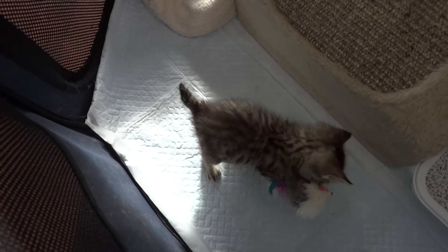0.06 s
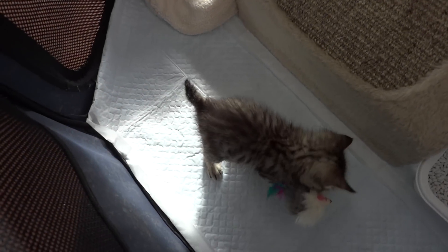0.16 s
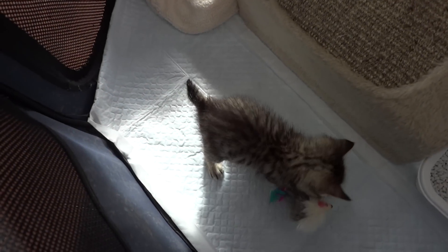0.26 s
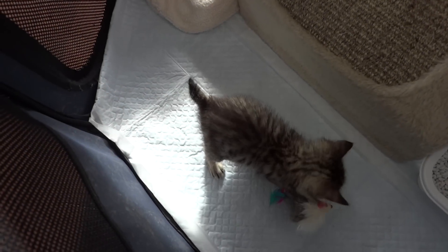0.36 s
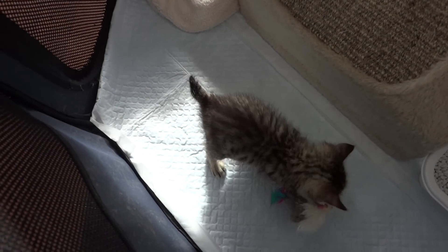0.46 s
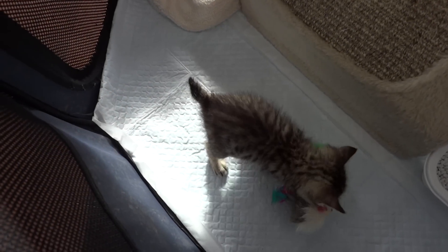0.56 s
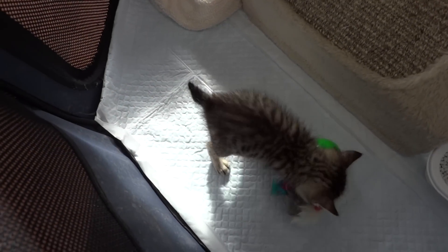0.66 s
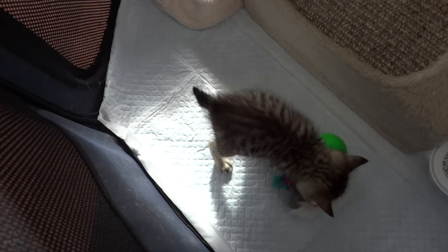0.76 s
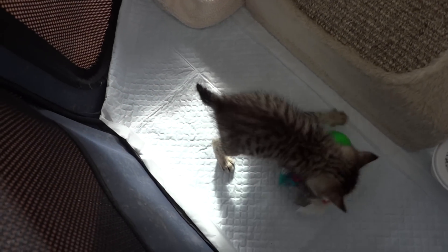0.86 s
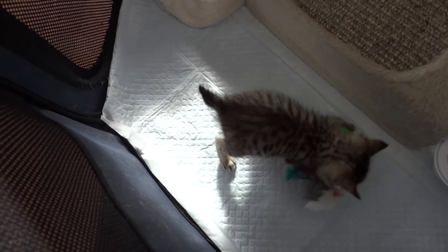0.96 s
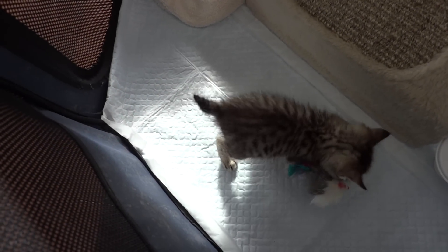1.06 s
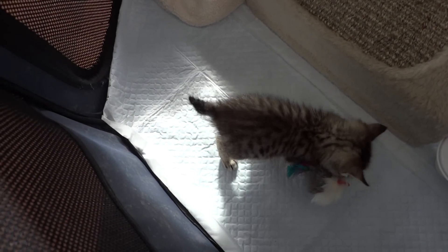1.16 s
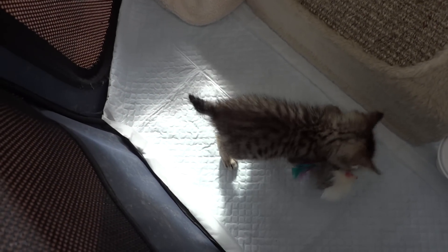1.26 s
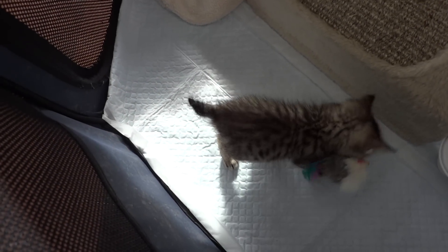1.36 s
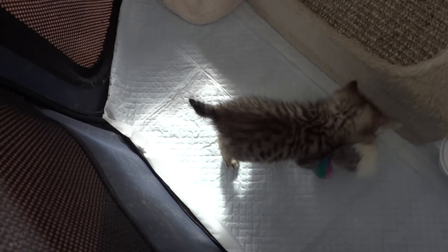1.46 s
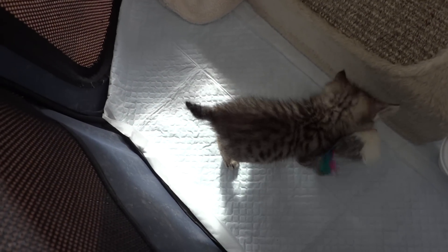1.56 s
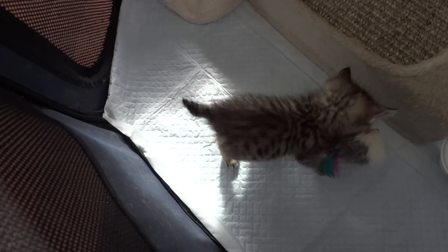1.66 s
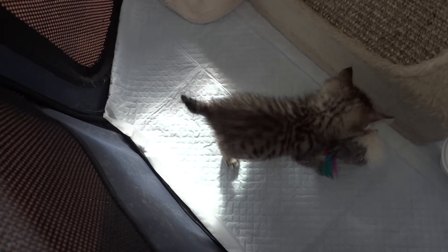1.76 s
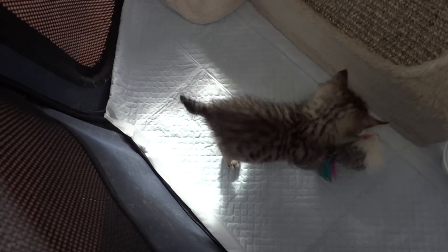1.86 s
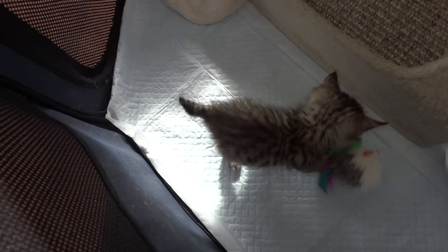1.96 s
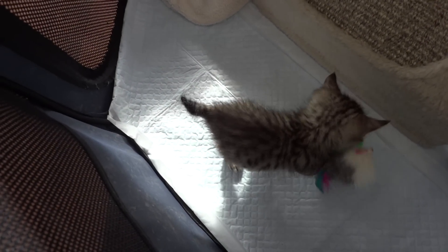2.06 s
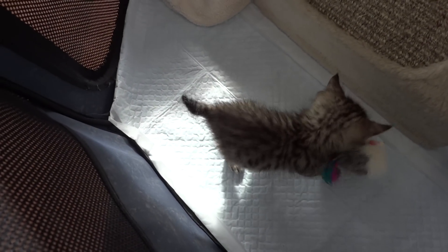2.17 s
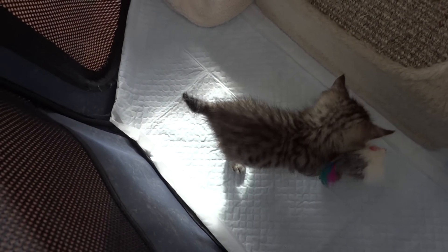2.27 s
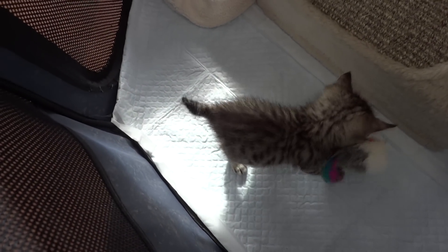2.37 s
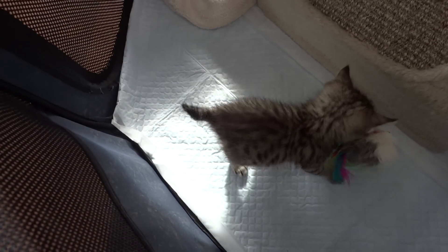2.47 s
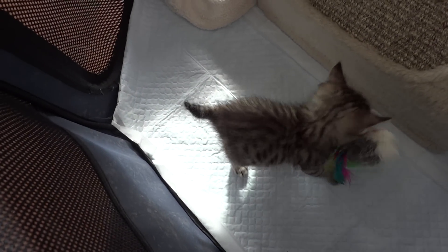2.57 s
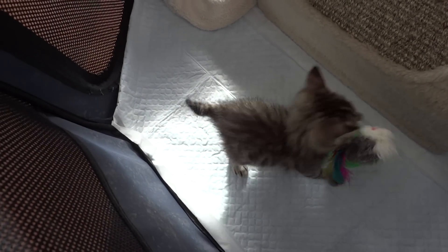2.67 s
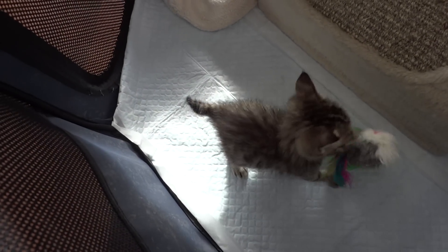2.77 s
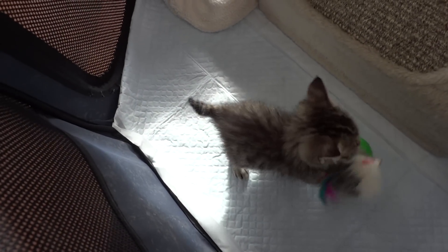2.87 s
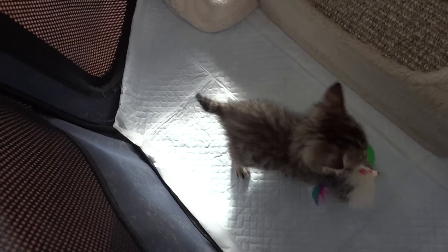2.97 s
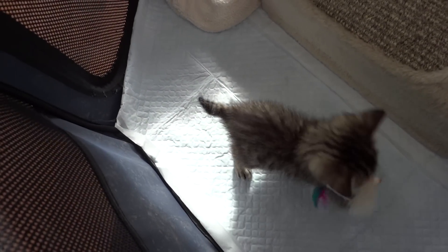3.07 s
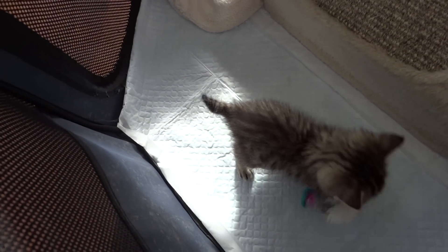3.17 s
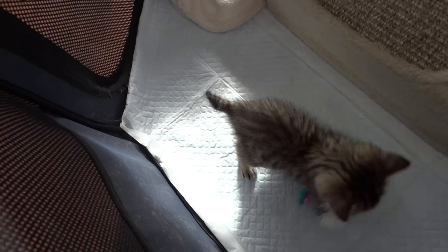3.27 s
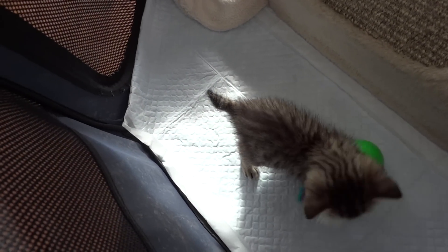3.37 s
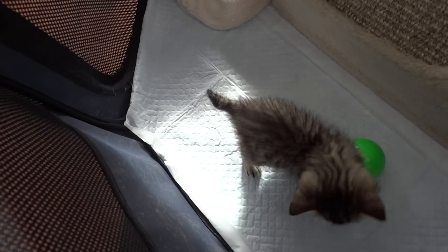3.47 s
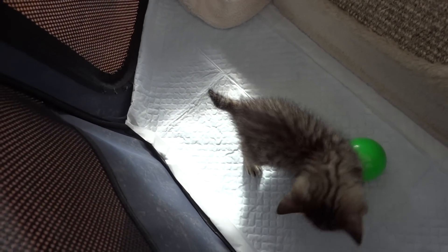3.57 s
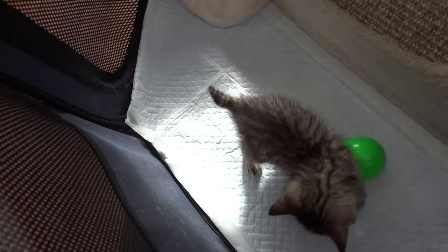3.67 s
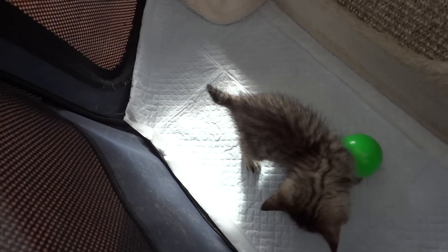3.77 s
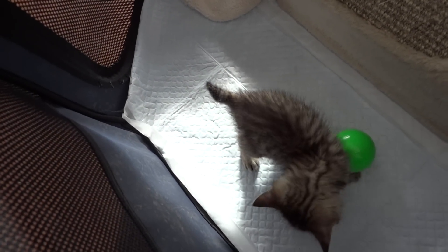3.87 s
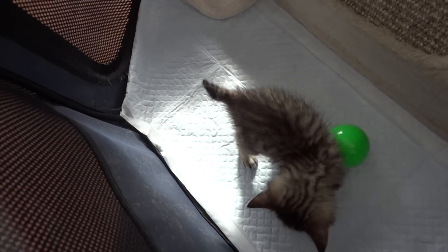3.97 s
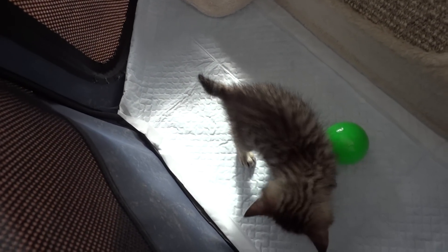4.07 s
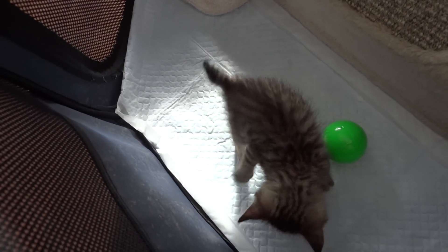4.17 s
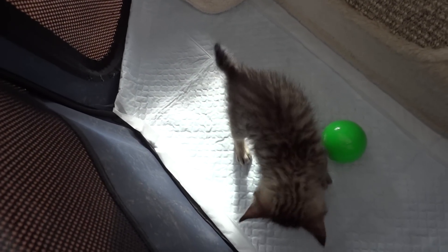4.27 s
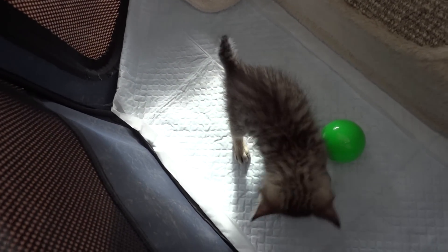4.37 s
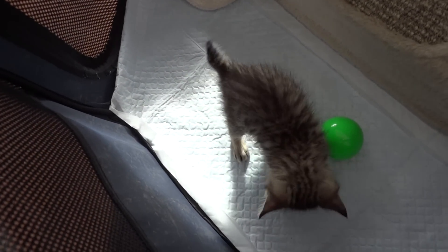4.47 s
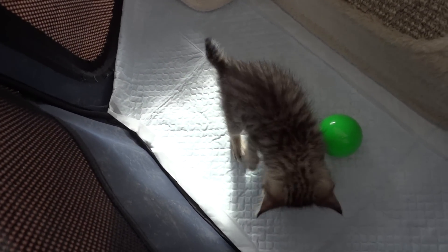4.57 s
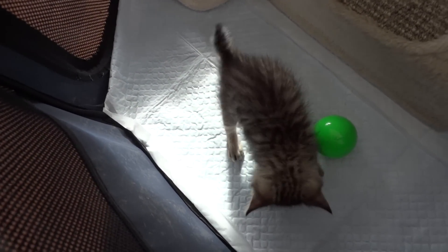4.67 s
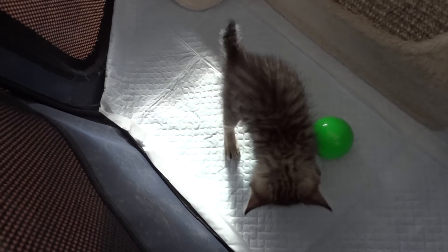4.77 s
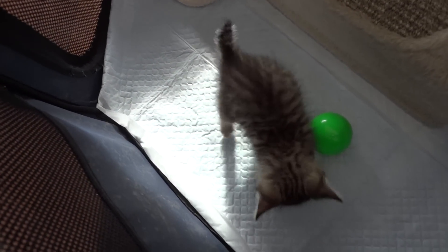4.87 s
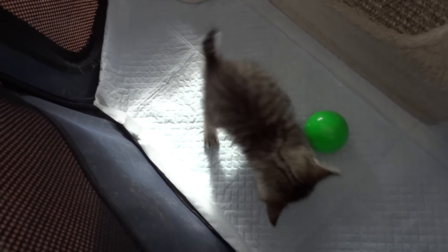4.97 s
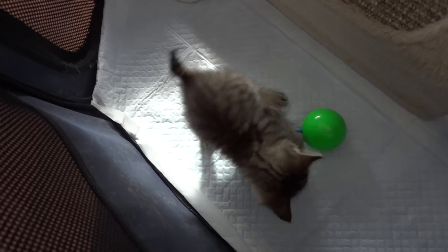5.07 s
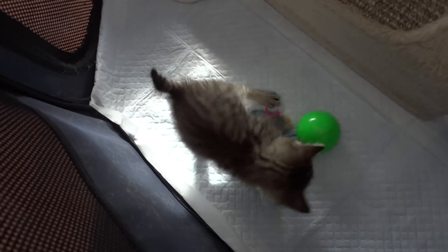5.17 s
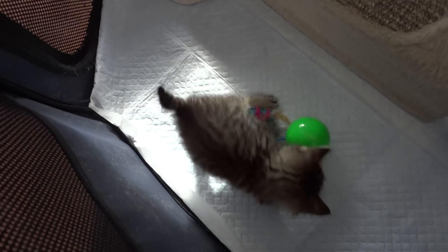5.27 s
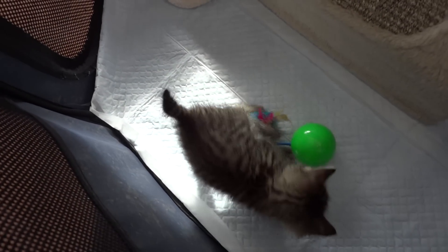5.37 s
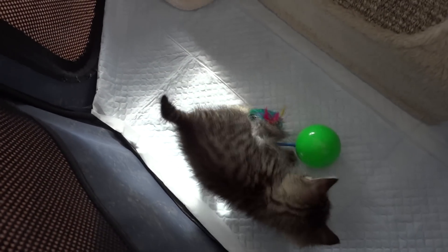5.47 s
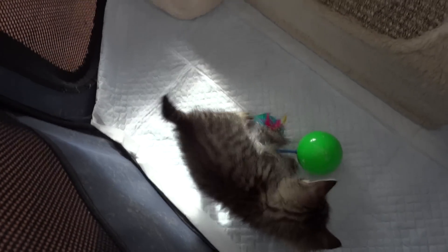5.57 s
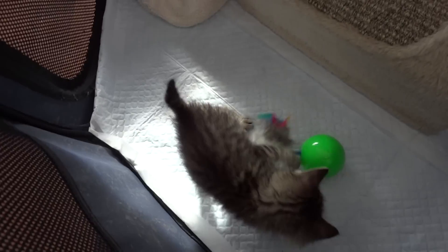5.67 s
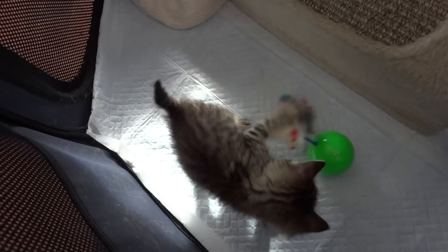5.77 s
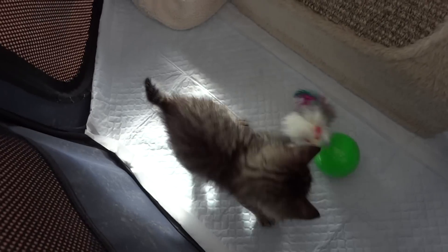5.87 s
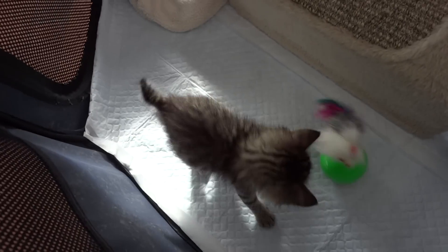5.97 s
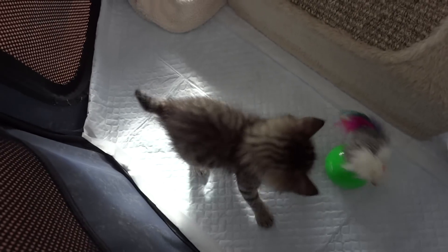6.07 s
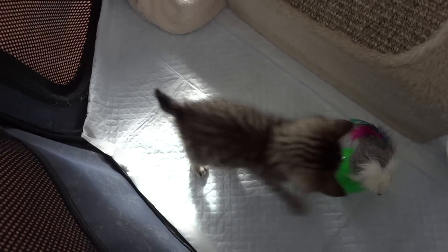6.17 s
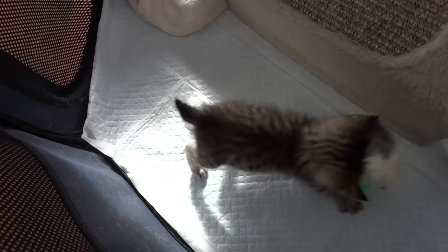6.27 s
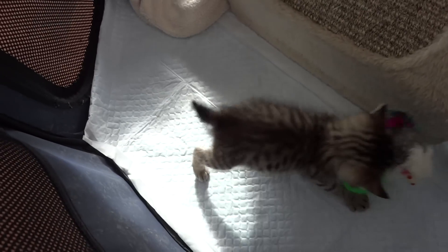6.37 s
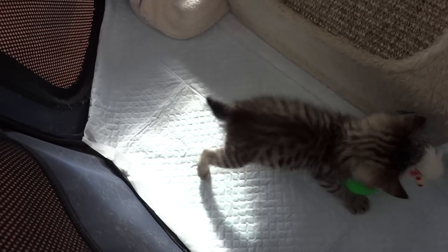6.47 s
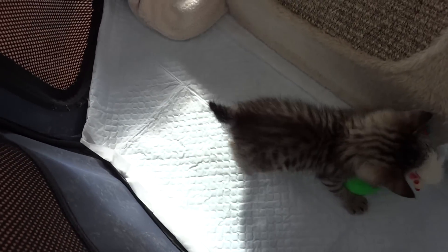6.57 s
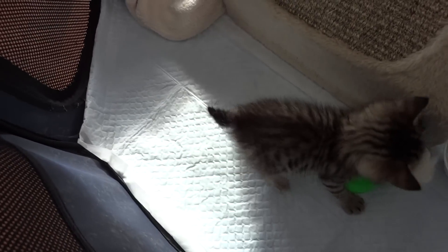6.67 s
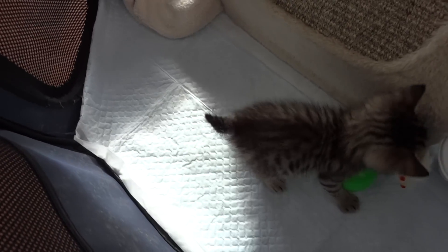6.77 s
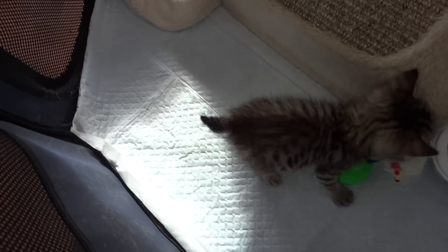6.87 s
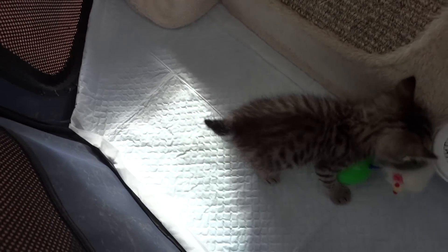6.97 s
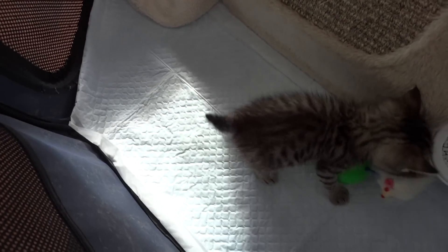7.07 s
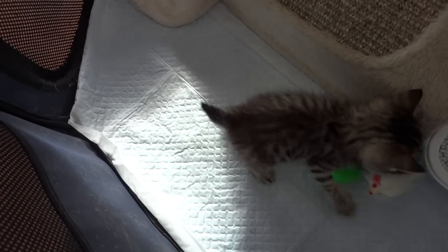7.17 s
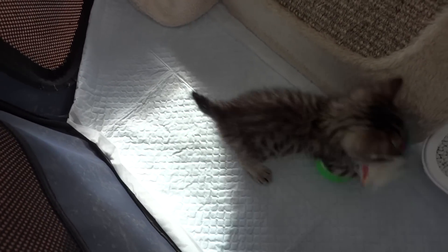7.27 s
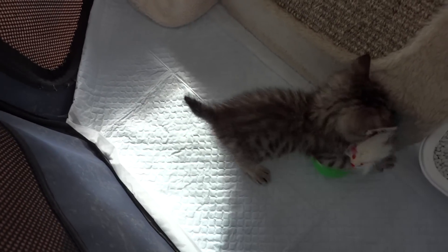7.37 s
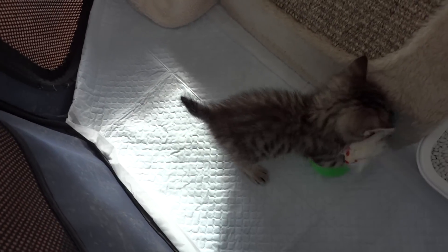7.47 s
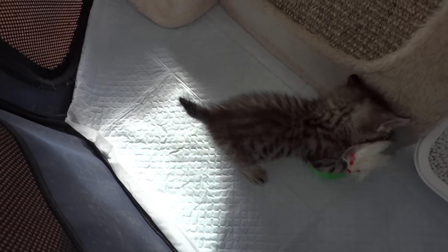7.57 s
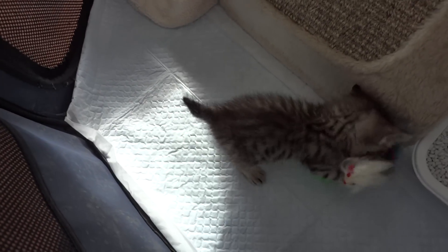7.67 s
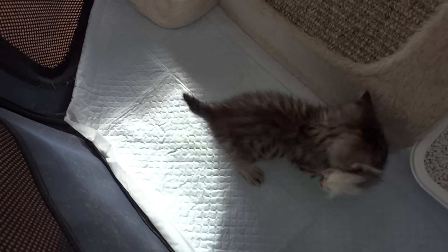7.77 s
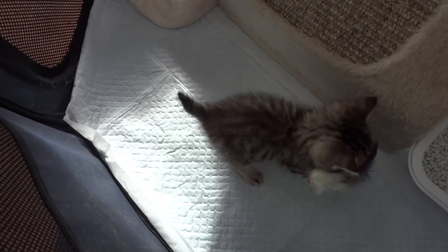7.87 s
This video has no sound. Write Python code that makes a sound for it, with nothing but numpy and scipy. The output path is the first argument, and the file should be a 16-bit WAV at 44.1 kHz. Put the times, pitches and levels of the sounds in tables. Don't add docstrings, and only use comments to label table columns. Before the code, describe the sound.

Sharp bright cracks open the scene, then delicate paper rustles come and go as a kitten plays with a feather toy. A thin plastic ball taps faintly midway. Vigorous crumpling swells, snapping loudly as the little body lands with a dull thump. Quick rubbing shoves push the hollow ball, which knocks hard twice, before light crinkles fade. Small indoor space, low mains hum, soft traffic wash, closely spaced stereo pickup.

```python
import sys
import numpy as np
from scipy import signal
from scipy.fft import rfft, irfft
from scipy.io import wavfile
from scipy.ndimage import uniform_filter1d

SR = 44100
rng = np.random.default_rng(int(sys.argv[2]) if len(sys.argv) > 2 else 0)


def field_ratio(decibels):
    return 10 ** (np.asarray(decibels, dtype=float) / 20)


def generate_wav(signal):
    frames = np.transpose(np.atleast_2d(signal))
    scaled = np.clip(frames, -1, 1) * 32767
    pcm = np.round(scaled).astype(np.int16)
    wavfile.write(sys.argv[1], SR, pcm)


N = 349272

# (frequency [Hz], level [dB per Hz])
AIR_SHARED = [(12, -43), (22, 1.5), (100, -3.5), (140, -2), (175, -3.5), (260, -10), (372, -12), (428, -19),
              (772, -18.5), (1600, -21), (2000, -28.5), (4900, -33), (8200, -32.5), (15700, -38.5)]
# (frequency [Hz], level [dB per Hz])
AIR_DIFFERENT = [(12, -51), (20, -26), (206, -2), (297, -4.5), (332, -6), (535, -9), (794, -5.5),
                 (1650, -13.5), (2240, -14), (2730, -19.5), (4930, -27.5), (7950, -30.5), (16500, -47)]
# (frequency [Hz], width [Hz], level [dB])
WASH_BANDS = [
    [(1080, 370, 0)],
    [(2378, 700, 0)],
    [(6700, 260, 11), (8200, 480, 12.5)],
]
# (low [dB], middle [dB], high [dB])
WASH_LEVELS = (-77.5, -79.5, -82.5)
# (peak time [s], rise [s], fall [s], level [dB])
PASSES = [
    [(.3, 1.7, .6, -63.5), (1.1, 1.5, 1.5, -71.5), (7.2, 1.5, 1.1, -81)],
    [(1.5, 3, 2.5, -76.5), (7.9, 3.5, .5, -70)],
    [(7.2, 1.5, 1.2, -84)],
]
# (frequency [Hz], level [dB])
HUM = [(100, -68), (200, -56.5)]

# (peak time [s], rise [s], fall [s], crinkle level [dB], folds over crinkle [dB])
PAWS = [(0.0, .01, 0.45, -78.5, 10), (0.385, .03, .03, -70, 6), (0.742, 0.34, 0.26, -65.5, -8.5),
        (1.036, 0.19, 0.11, -64, -7), (1.558, .04, .12, -67, -1), (1.622, 0.025, 0.08, -59, -8),
        (1.69, .1, 0.3, -70, -7), (2.185, 0.031, 0.23, -61, -2), (2.273, 0.12, .055, -58, -10),
        (2.369, .15, .08, -66.5, -5), (2.873, 0.056, .07, -60, -2.5), (2.991, 0.34, 0.35, -70.5, -3),
        (3.13, 0.21, 0.6, -69.5, -8), (3.285, .4, 0.12, -70.5, -1), (3.79, 0.085, 0.1, -70, -3),
        (4.049, 0.37, .3, -69, -1.5), (6.97, .15, 0.34, -73.5, -2), (7.096, 0.34, 0.44, -70.5, -2.5),
        (7.345, 0.072, 0.11, -65, 6), (7.523, .12, 0.21, -67.5, 5.5), (7.9, 0.41, .2, -80, 9),
        (6.08, .3, .3, -68.5, -3), (6.24, .15, .15, -66, -2), (6.32, .1, .1, -66, -3)]
# (peak time [s], rise [s], fall [s], crinkle level [dB], folds over crinkle [dB])
POUNCE = [(4.525, .015, 0.42, -55.5, -12), (4.565, .03, .06, -56.5, 0), (4.728, .02, .08, -65, 0),
          (4.64, 0.13, 0.074, -50, -0.5), (4.762, 0.05, 0.25, -55, 0), (4.895, 0.11, 0.2, -58, -12),
          (5.098, 0.091, 0.29, -45, -7), (5.245, 0.015, 0.031, -42, 2), (5.272, 0.03, .15, -46, 0),
          (5.426, 0.083, 0.3, -49.5, -8), (5.541, 0.068, 0.13, -47, -5), (5.601, 0.066, 0.064, -41, -1),
          (5.7, .1, 0.48, -72.5, 8.5), (5.875, .1, 0.18, -66, 6), (5.96, 0.11, .1, -67.5, 5)]
# (peak time [s], rise [s], fall [s], crinkle level [dB], folds over crinkle [dB])
SHOVES = [
    (6.026, 0.05, 0.045, -54.5, 0),
    (6.128, 0.025, 0.064, -53, 3.5),
    (6.204, .08, 0.06, -58.5, 3.5),
    (6.288, 0.057, 0.063, -53.5, 1),
    (6.408, .15, 0.15, -51.5, -5.5),
    (6.52, 0.11, 0.11, -55, -7),
    (6.566, .2, .012, -58.5, -6),
]
# (pressed sheet [dB], fibre fizz [dB], ball shell [dB])
WOKEN = [(-9, -21, -43), (-9, -19.5, -18), (-7.5, -14, 2.6)]
# (peak time [s], rise [s], fall [s], level [dB])
LEANS = [
    (4.55, .06, .06, -71),
    (4.79, 0.078, 0.09, -61),
    (5.12, .1, 0.14, -68),
    (5.55, .1, 0.11, -51.5),
    (4.6, 0.1, 0.17, -66),
    (5.7, 0.14, 0.12, -63),
    (5.875, 0.057, 0.15, -64),
    (6.02, 0.072, 0.079, -80),
]
# (peak time [s], rise [s], fall [s], level [dB])
SWIPES = [
    (4.53, .03, .12, -63),
    (5.098, 0.059, .15, -51.5),
]
# (peak time [s], rise [s], fall [s], level [dB])
NUDGES = [
    (3.6, 0.07, 0.059, -63),
    (5.6, 0.024, 0.18, -51),
    (6.52, .1, .07, -52),
    (6.6, .1, 1.8, -71),
]
# (frequency [Hz], width [Hz], level [dB])
LIGHT_CRINKLE = [(7100, 1400, -4), (8270, 880, 4), (9400, 1400, -3.5), (10650, 1100, -19)]
# (frequency [Hz], width [Hz], level [dB])
FIRM_CRINKLE = [(7040, 1400, 0), (8400, 2500, 3.5), (10440, 990, -21)]
# (frequency [Hz], width [Hz], level [dB])
FOLDS = [(5000, 1940, -3.5), (5770, 760, 1), (6730, 1660, 1)]
# (frequency [Hz], width [Hz], level [dB])
PRESSED_SHEET = [(1650, 600, -9), (2235, 500, -6), (3140, 800, 0), (3900, 700, -8), (4710, 600, -4.5)]
# (frequency [Hz], width [Hz], level [dB])
FIZZ = [(11650, 2100, 6), (13100, 2200, -14), (14900, 1900, 1)]
# (frequency [Hz], width [Hz], level [dB])
DRAGGED_SHELL = [(350, 710, -6), (763, 390, -0.5), (1290, 1300, -8)]

# (time [s], peak level [dB], echo level [dB])
CRACKS = [
    (0.0024, -25, -19),
    (0.0074, -25.5, -5.5),
    (2.5037, -24, -11.5),
]
# (frequency [Hz], width [Hz], level [dB])
CRACK_TONES = [(5500, 670, -19), (6930, 950, -13), (9200, 1570, 6.5), (12000, 1400, -13),
               (14000, 1500, -10), (15800, 1800, -22)]

# (time [s], peak level [dB], pitch [Hz], broad side [dB],
# low part [dB])
SNAPS = [(0.058, -43, 8850, -9, -20), (0.131, -47, 8900, -13, -24), (0.3825, -51, 10300, -20, -28),
         (0.948, -38, 9900, -18, -35), (1.5314, -55, 8500, -6, -25), (1.5469, -52, 6830, -11, -18),
         (1.5847, -48, 8900, -10, -22), (1.611, -36, 9400, -22, -30), (1.6373, -41, 8300, -14, -26),
         (2.158, -57, 8180, -7, -16), (2.1695, -50, 8200, -5, -15), (2.1833, -43, 8240, -5, -16),
         (2.1924, -46, 8200, -14, -26), (2.2034, -47, 9180, -9, -26), (2.2104, -41.5, 8330, -2.5, -21),
         (2.2423, -38, 8270, -13, -20), (2.263, -39, 8480, -7, -17), (2.2774, -51, 8270, -4, -17),
         (2.2863, -40.5, 8160, -9, -26), (2.331, -38, 8350, -17, -33), (2.3484, -56, 8100, -5, -17),
         (2.3585, -54, 8300, -17, -22), (2.5262, -46, 7200, -32, -35), (2.8449, -52, 8260, -4, -10),
         (2.874, -43, 8200, -14, -21), (2.9352, -52, 8130, -19, -20), (2.9813, -38, 8300, -26, -35),
         (3.027, -53, 8200, -24, -22), (3.0947, -38, 7760, -15, -14), (3.2021, -51, 8080, -23, -17),
         (3.273, -39.5, 8360, -17, -19), (3.516, -54, 8100, -10, -14), (3.6693, -45, 8050, -4, -19),
         (4.0372, -51, 8830, -10, -23),
         (4.9731, -39, 8300, -8, -16), (5.0138, -50, 7200, -11, -16), (5.1864, -37, 8240, -6, -22),
                (5.2043, -29, 8260, -11, -25), (5.2134, -37, 8110, -14, -19),
                (5.226, -37.5, 8140, -12, -26), (5.2332, -22.5, 8300, -4, -25),
                (5.2358, -31, 8300, -5, -26), (5.2402, -25.5, 9200, -3, -19), (5.2462, -24, 8240, -4, -24),
                (5.2472, -23, 8300, -6, -24), (5.2503, -20, 8300, 3, -18), (5.2528, -33, 7600, -5, -21),
                (5.259, -30, 8700, -3, -24), (5.2726, -29, 8400, -8, -19), (5.2755, -36, 7400, 4, -25),
                (5.2823, -33.5, 7160, 5.5, -17), (5.311, -37, 7220, -8, -21), (5.3235, -32, 9000, -1, -25),
                (5.3424, -38, 8450, -13, -28), (5.5943, -20.5, 8300, -3.5, -12),
                (5.5975, -24, 7400, -4.5, -16),
         (5.7523, -48, 7500, -12, -24), (5.8324, -44, 6870, -1, -3), (5.855, -45, 7520, 0, -13),
               (5.8745, -40.5, 8530, 1.5, -14), (5.9125, -36, 7700, -8, -17), (5.9534, -56, 6500, -2, -5),
               (6.0242, -47, 8000, -14, -22), (6.106, -46, 7080, 4, -11), (6.126, -45, 7400, -9, -17),
               (6.1841, -31, 8100, -8, -19), (6.1974, -41, 6970, -2, -8), (6.2644, -47, 7110, -4, -9),
               (6.2821, -45, 7880, -7, -12), (6.3988, -48, 7720, 6, -12), (6.4672, -47, 8680, -9, -14),
               (6.749, -54.5, 8470, -17, -16), (6.9634, -51.5, 8180, -18, -15),
               (7.0862, -38.5, 8200, -18, -30), (7.2938, -58, 8300, -5, -9), (7.3337, -42, 7150, -9, -14),
               (7.3488, -38, 7290, -5, -16), (7.3704, -52, 7300, -5, -10), (7.4689, -55, 7320, -10, -10),
               (7.4889, -46, 7360, -8, -13), (7.5196, -41.5, 7250, -10, -15), (7.5284, -50, 7280, -14, -20),
               (7.5454, -51, 7280, -4, -13), (7.5547, -47, 7200, -2, -17), (7.5961, -57, 7400, -7, -12),
               (7.6595, -61, 7650, -10, -7), (7.8866, -57.5, 7600, 3, -5),
         (.3875, -45, 8600, -14, -25), (2.177, -54, 8200, 4, -22), (2.2204, -51, 8300, -5, -25),
               (2.2534, -46, 8200, -16, -25), (6.3293, -48, 7800, -6, -20), (.0705, -45.5, 7200, -20, -19),
               (.331, -54, 9200, -25, -30), (5.39, -45, 9500, -15, -25), (4.722, -51, 7000, -6, -12)]
# (frequency [Hz], width [Hz], level [dB])
CREASE_SIDE = [(4450, 900, -9), (5300, 920, 1), (6080, 1120, 1)]
# (frequency [Hz], width [Hz], level [dB])
UNDER_CREASE = [(1700, 700, -15), (2400, 820, -11), (3150, 560, -3), (3710, 720, 0)]
# (peak time [s], rise [s], fall [s], level [dB], pitch [Hz])
RIDGES = [(4.57, .05, .08, -60, 7000), (4.585, .05, .06, -64, 6000), (4.625, 0.053, 0.072, -59, 7300),
          (4.65, .08, 0.053, -61, 5850), (4.63, 0.11, .08, -63.5, 3300), (4.76, 0.028, 0.06, -61, 5760),
          (4.82, .1, .15, -64, 6750), (4.825, .06, 0.11, -62, 9000), (5.11, 0.089, .14, -50.5, 7320),
          (5.12, 0.095, 0.11, -60, 3070), (5.44, 0.089, 0.11, -51.5, 8300), (5.43, .08, 0.1, -56, 9300),
          (5.46, .1, .15, -59.5, 5560), (5.545, .07, .1, -47.5, 7400), (5.55, 0.13, 0.11, -59, 3150),
          (5.63, .08, .08, -55, 6280), (5.79, .08, .1, -67, 2350), (6.33, .05, .03, -63, 5500),
          (2.2, .05, .05, -69, 5600), (1.76, .15, .15, -71, 8170), (1.72, .15, .15, -76, 6700),
          (2.18, .05, .08, -65, 8150), (.385, .015, .02, -64, 5500), (6.52, .05, .05, -61.5, 3000)]

# (time [s], peak level [dB], pitch [Hz], time to fall 60 dB [s], puff level [dB])
THUDS = [
    (4.9735, -44, 800, .012, -6),
    (1.375, -48, 530, 0.042, -25),
    (5.577, -33, 600, 0.0083, -14),
    (5.583, -29, 350, 0.0095, -3),
    (5.594, -23, 305, 0.02, -13.5),
    (5.5917, -28, 128, 0.05, -12),
    (6.436, -42, 307, 0.05, -0.5),
    (6.515, -40.5, 743, 0.12, -10),
]
# (time [s], peak level [dB], pitch [Hz], time to fall 60 dB [s], puff level [dB])
TAPS = [
    (3.552, -53, 1200, .012, -8),
    (3.586, -50, 1400, .012, -10),
    (3.598, -48, 1260, .02, -10),
    (3.612, -51, 1600, .012, -10),
]
# (time [s], peak level [dB], pitch [Hz], time to fall 60 dB [s], puff level [dB])
BUMPS = [
    (5.217, -37.5, 350, 0.031, -30),
]
# (time [s], peak level [dB])
KNOCKS = [
    (3.735, -48.5),
    (3.7376, -38.5),
    (6.3523, -27.5),
    (6.437, -26.5),
]
# (frequency [Hz], level [dB], time to fall 60 dB [s])
SHELL_SPOTS = [
    [(676, 11.5, 0.016), (806, 8, 0.019), (1085, 5.5, 0.023), (1626, 3, 0.02), (1950, -2, 0.023),
     (3270, 6, 0.0073), (4270, 10, 0.0053), (5750, 16, 0.0043), (8700, 15, 0.004), (9450, 10, 0.0047),
     (12300, 6, 0.004)],
    [(1680, 6, 0.013), (1950, -5.5, 0.03), (2660, -1, 0.0093), (3280, 2.5, 0.0098), (4870, -5.5, 0.0097),
     (5800, -6, .006), (7600, 14, 0.0051), (8400, 13, 0.0052), (11300, 5, 0.004), (14400, 10, 0.0025),
     (15700, 9, .003), (8830, 6, .004)],
    [(1470, 3.5, 0.0092), (1600, 2.5, 0.011), (1980, 0, 0.018), (2940, 9, 0.0072), (3190, 2, .006),
     (3560, 0.5, 0.012), (3970, -2, 0.0098), (4840, -4, 0.01), (5800, 2, 0.0076), (8260, 6.5, 0.0049),
     (8750, 12, 0.005), (9330, 6, .004), (10200, 1, 0.005), (11300, -1, .004), (13200, 4, 0.0029),
     (15300, 5, 0.0022)],
]

# (frequency [Hz], lead [radians])
LEFT_LEAD = [(30, -.1), (70, -.8), (250, -1.9), (900, -2.2), (1600, -1.1), (2600, -1), (4200, -.6),
             (7000, -.45), (15000, -.2)]
# (frequency [Hz], level [dB])
PORT_DIFFERENCE = [(300, -52), (800, -2), (2500, -3.5), (5000, -5), (15000, -8.5)]


def evened(x):
    return x / np.sqrt(np.mean(x ** 2) + 1e-20)


def peaked(x):
    return x / np.max(abs(x))


def read(points, hz):
    f, value = np.transpose(points)
    return np.interp(np.log(hz + 1), np.log(f + 1), value)


def add(mix, s, sound):
    part = mix[max(round(s * SR), 0):][:len(sound)]
    part += sound[:len(part)]


def resonate(x, hz, width):
    b, a = signal.iirpeak(np.clip(hz, 20, .45 * SR), max(hz / width, .3), SR)
    once = signal.lfilter(b, a, x)
    return signal.lfilter(b, a, once)


def body(x, modes):
    return sum((-1) ** k * field_ratio(db) * resonate(x, hz, width) for k, (hz, width, db) in enumerate(modes))


def slow(smooth_s):
    size = round(smooth_s * SR)
    smoother = uniform_filter1d(rng.standard_normal(N), size)
    return evened(uniform_filter1d(smoother, size))


def burst(noise, t60):
    t = np.arange(len(noise)) / SR
    return noise * field_ratio(-60 * t / t60) * np.minimum(t / 0.000067, 1)


def fading(t, rise, fall):
    return np.where(t < 0, -t / np.maximum(rise, .005), t / np.maximum(fall, .005))


SPAN_DB = 20


def swells(rows):
    t = np.arange(0, N + 32, 32) / SR
    s, rise, fall, db = np.transpose(rows)[:, :, None]
    level = field_ratio(db - SPAN_DB * fading(t - s, rise, fall))
    return np.interp(np.arange(N) / SR, t, (level ** 2).sum(0))


def air():
    hz = np.fft.rfftfreq(N, 1 / SR)

    def coloured(spectrum):
        return evened(irfft(rfft(rng.standard_normal(N)) * field_ratio(read(spectrum, hz)), N))

    mid = field_ratio(-59.5) * coloured(AIR_SHARED)
    side = field_ratio(-67.5) * coloured(AIR_DIFFERENT)
    return np.array([mid + side, mid - side])


def wash():
    out = 0
    noises = rng.standard_normal((3, 3, N))
    for db, passes, bands, noise in zip(WASH_LEVELS, PASSES, WASH_BANDS, noises):
        alike = min(bands[0][0] / 3000, 3)
        level = np.sqrt(field_ratio(db) ** 2 + swells(passes))
        flutter = field_ratio(2.0 * slow(0.02))
        out = out + level * flutter * evened(body(noise[:2] + alike * noise[2], bands))
    return out


def hum():
    t = np.arange(N) / SR
    waver_db = .4 * slow(.03)
    return sum(np.sqrt(2) * field_ratio(db + waver_db) * np.sin(2 * np.pi * hz * t) for hz, db in HUM)


def slips(per_s, spread_db, clump_db):
    happens = rng.random(N) < per_s / SR
    size = field_ratio(spread_db * np.minimum(rng.exponential(1, N), 3.5)) * happens
    clumps = field_ratio(clump_db * np.minimum(slow(0.0084), 1.5))
    return size * np.clip(rng.standard_normal(N), -2, 2) * clumps


def rustle():
    strokes = PAWS + POUNCE + SHOVES
    kinds = [swells([row[:4] for row in rows]) for rows in (PAWS, POUNCE, SHOVES)]
    folds = swells([(s, rise, fall, db + fold_db) for s, rise, fall, db, fold_db in strokes])
    woken = field_ratio(np.transpose(WOKEN)) ** 2 @ np.array(kinds)
    press, fizz, drag = woken + [swells(rows) for rows in (LEANS, SWIPES, NUDGES)]

    firm = np.clip((10 * np.log10(sum(kinds) + 1e-20) + 65) / 12, 0, 1)
    crackle = evened(slips(4000, 1.5, 1.9))
    hiss = evened(slips(6600, 0.71, 0.4))
    drive = np.sqrt(1 - firm) * crackle + np.sqrt(firm) * hiss

    out = np.sqrt(drag) * evened(body(drive, DRAGGED_SHELL))
    layers = [(kinds[0], -76.0, LIGHT_CRINKLE), (sum(kinds[1:]), -73.5, FIRM_CRINKLE),
              (folds, -77.0, FOLDS), (press, -83.0, PRESSED_SHEET), (fizz, -87, FIZZ)]
    for power, still_db, modes in layers:
        level = np.sqrt(np.maximum(power - field_ratio(still_db) ** 2, 0))
        out = out + level * evened(body(drive * rng.choice([-1., 1.], N), modes))
    return out


SNAP_CLICK = 5


def cracks():
    out = np.zeros((2, N))
    for (s, db, echo_db), noise in zip(CRACKS, rng.standard_normal((len(CRACKS), 2, 16000))):
        click = SNAP_CLICK * (np.arange(16000) == 3)
        crack = body(burst(noise[0], .018) + click, CRACK_TONES)
        echo = body(burst(noise[1], 0.4), CRACK_TONES)
        add(out[0], s + .001, field_ratio(db) * peaked(crack))
        add(out[1], s + .001, field_ratio(db + echo_db - 9.0) * echo / np.max(abs(crack)))
    return out


def snaps():
    out = np.zeros(N)
    rows = SNAPS
    for (s, db, hz, side_db, low_db), noise in zip(rows, rng.standard_normal((len(rows), 1200))):
        chatter_s = 0.012 * np.exp(.2 * np.clip(noise[-1], -1, 2))
        push = burst(noise, chatter_s)
        push = push + SNAP_CLICK * (np.arange(len(push)) == 3)
        patch = peaked(resonate(resonate(push, hz, 2300), .92 * hz, 8000))
        patch = peaked(patch + 0.14 * peaked(body(push, LIGHT_CRINKLE)))
        fizz = 0.02 * peaked(body(push, FIZZ))
        side = field_ratio(side_db) * peaked(body(push, CREASE_SIDE))
        low = field_ratio(low_db + 1.5) * peaked(body(push, UNDER_CREASE))
        add(out, s + .0006, field_ratio(db + 2.5) * (patch + fizz + side + low))
    return out


def ridges():
    noise = rng.standard_normal((len(RIDGES), SR // 2))
    t, out = np.arange(SR // 2) / SR - .25, np.zeros(N)
    for (s, rise, fall, db, hz), rub in zip(RIDGES, noise):
        level = field_ratio(db - SPAN_DB * fading(t, rise, fall) ** 2)
        add(out, s + t[0], level * evened(resonate(rub, hz, 500)))
    return out


def thuds(rows):
    out, t = np.zeros(N), np.arange(6000) / SR
    for (s, db, hz, t60, puff_db), noise in zip(rows, rng.standard_normal((len(rows), 6000))):
        puff = field_ratio(puff_db) * evened(resonate(noise, 2 * hz, 3 * hz))
        push = np.sin(2 * np.pi * hz * t) + puff
        add(out, s, field_ratio(db - 60 * t / t60) * push * np.minimum(t / 0.00059, 1))
    return out


def knocks():
    out, t = np.zeros(N), np.arange(3000) / SR
    for (s, db), modes in zip(KNOCKS, SHELL_SPOTS[:1] + SHELL_SPOTS):
        ring = 0
        for hz, mode_db, t60 in modes:
            build = np.minimum(t * hz / 2.4, 1)
            ring = ring + field_ratio(mode_db - 60 * t / t60) * np.sin(2 * np.pi * hz * t) * build
        add(out, s, field_ratio(db) * ring)
    return out


def ports(x):
    hz = np.fft.rfftfreq(N, 1 / SR)
    turn = np.exp(.5j * read(LEFT_LEAD, hz))
    echo = burst(rng.standard_normal(1200), .012)
    echo = rfft(echo / np.linalg.norm(echo), N) * field_ratio(read(PORT_DIFFERENCE, hz) - 3.5)
    return irfft(rfft(x) * np.array([turn + echo, 1 / turn - echo]), N)


def mottled(x, depth_db, bins, frames):
    z = signal.stft(x, nperseg=256, noverlap=192)[2]
    patches = rng.standard_normal(z.shape[::-1][:2]).T
    for _ in range(2):
        patches = uniform_filter1d(uniform_filter1d(patches, bins, 0), frames, 1)
    gain = field_ratio(depth_db * evened(patches))
    gain = gain / np.sqrt(np.mean(gain ** 2))
    return signal.istft(z * gain, nperseg=256, noverlap=192)[1][..., :N]


def low_pass(x, taps):
    return signal.oaconvolve(x, taps[None], "same")


def scene():
    pad = mottled(rustle(), 2.2, bins=2, frames=30)
    pad = pad - .3 * signal.lfilter(*signal.iirpeak(3890, 3890 / 700, SR), pad)
    crack, echo = cracks()
    steady = ports(pad + ridges() + snaps() + echo) + mottled(air(), 1.0, bins=3, frames=100) + wash()
    steady = low_pass(steady, signal.firwin(255, 15750, fs=SR))
    near = ports(crack + knocks() + thuds(THUDS + TAPS))
    return steady + near + thuds(BUMPS) + hum()


def top_cut(x):
    return signal.sosfilt(signal.butter(12, 17190, fs=SR, output="sos"), x)


def record(dry):
    limited = low_pass(dry, signal.firwin(255, 16700, window=("kaiser", 9), fs=SR))
    return top_cut(limited)


dry = scene()
out = record(dry)
generate_wav(out)
```